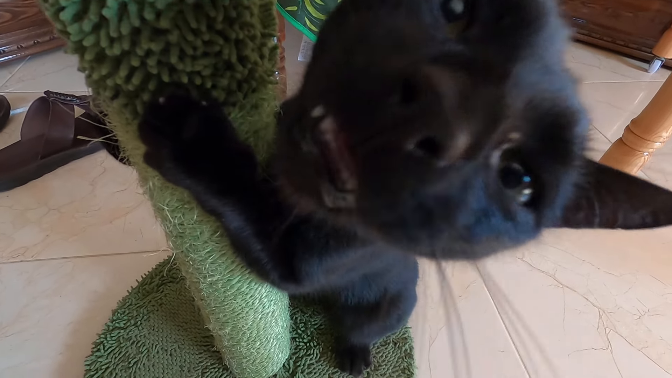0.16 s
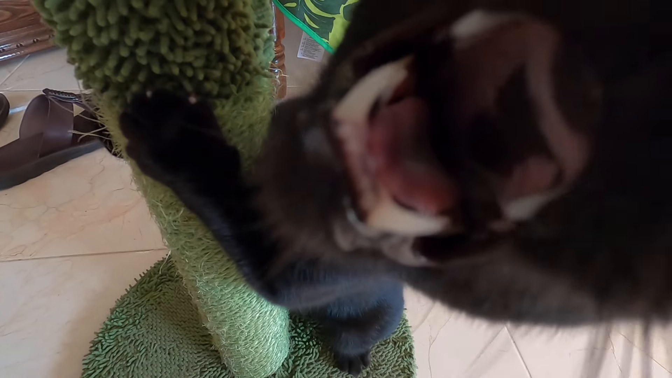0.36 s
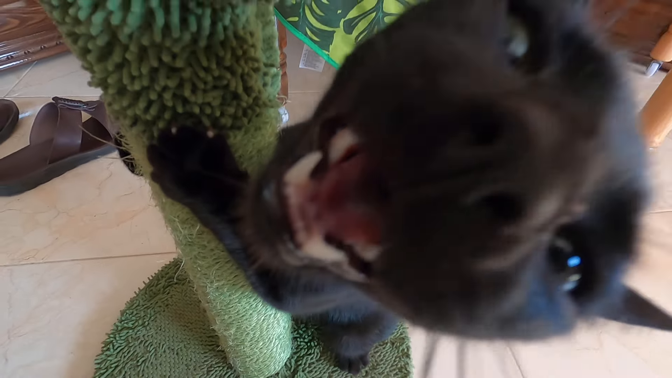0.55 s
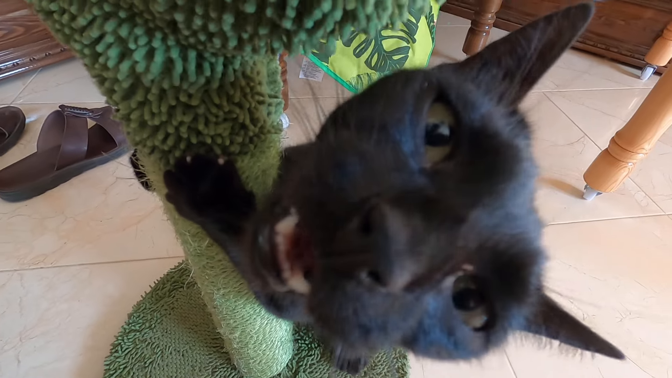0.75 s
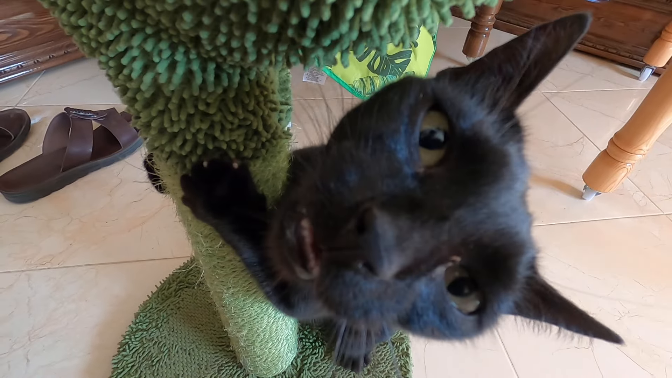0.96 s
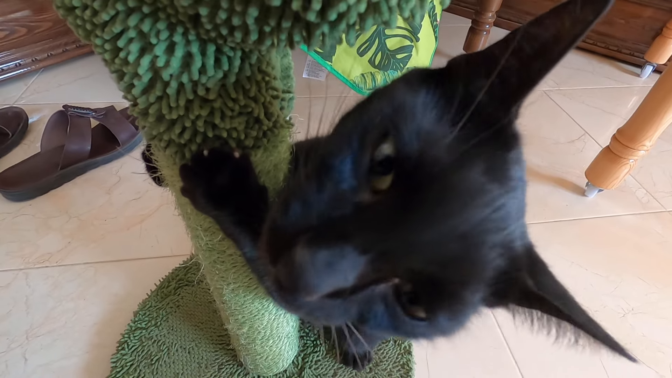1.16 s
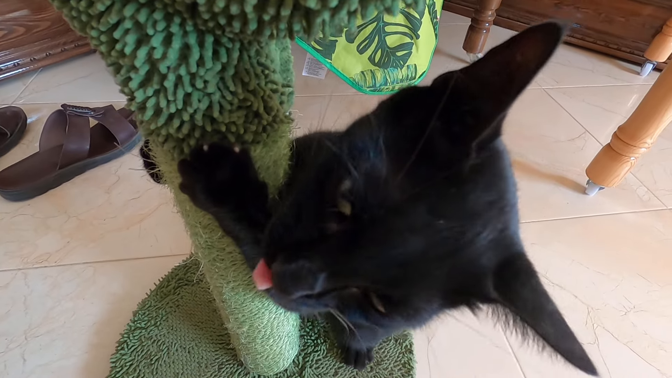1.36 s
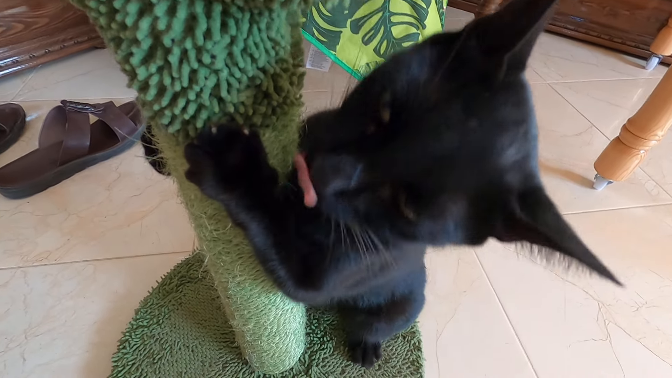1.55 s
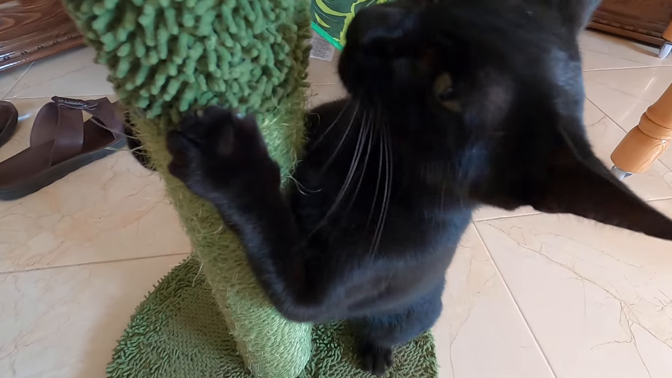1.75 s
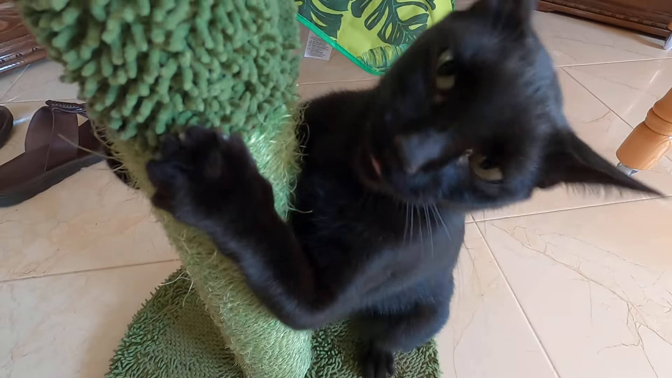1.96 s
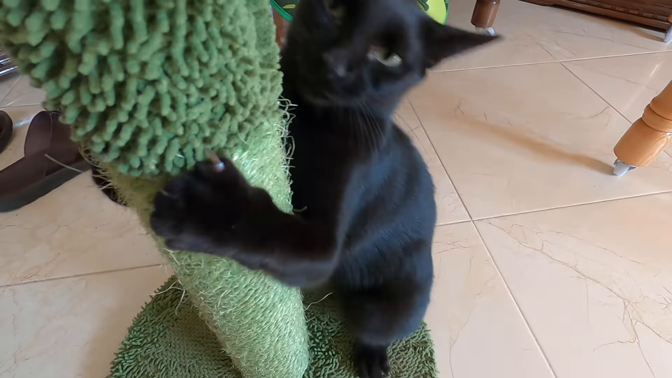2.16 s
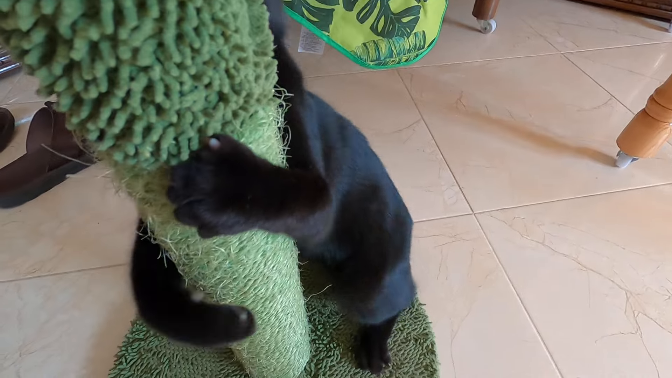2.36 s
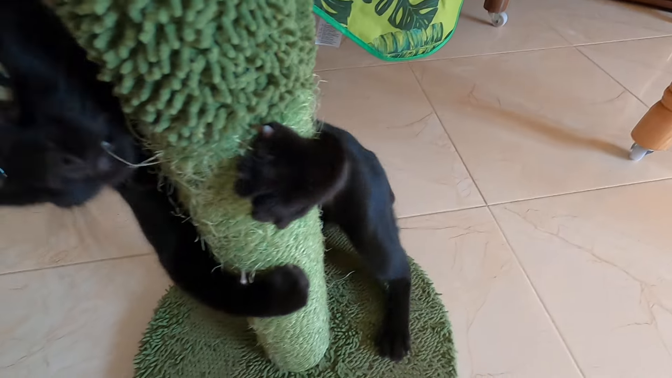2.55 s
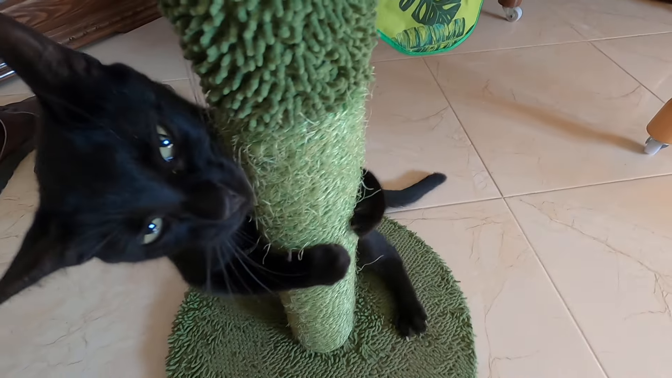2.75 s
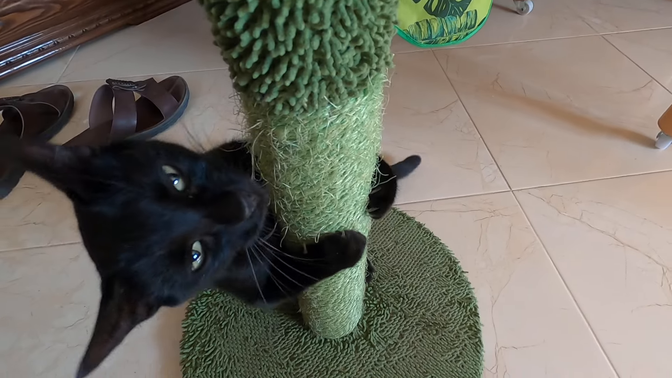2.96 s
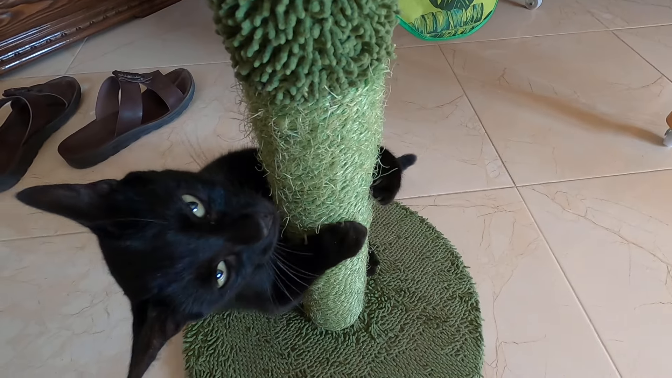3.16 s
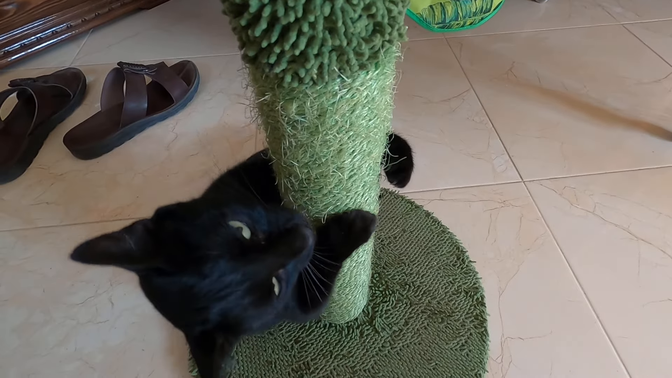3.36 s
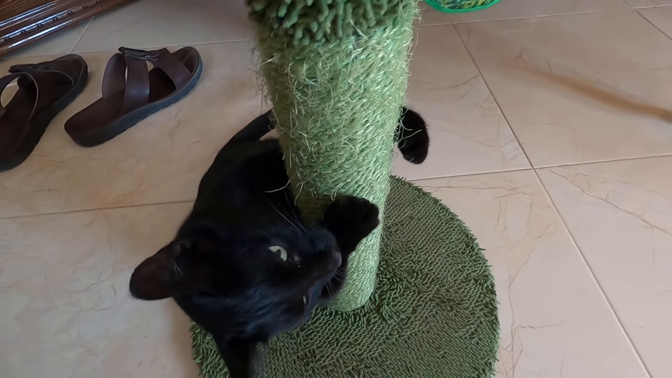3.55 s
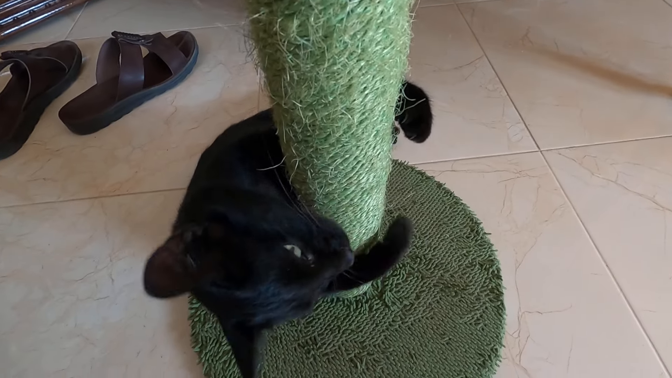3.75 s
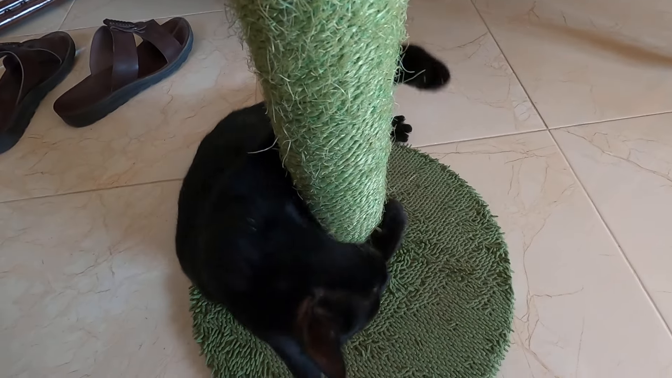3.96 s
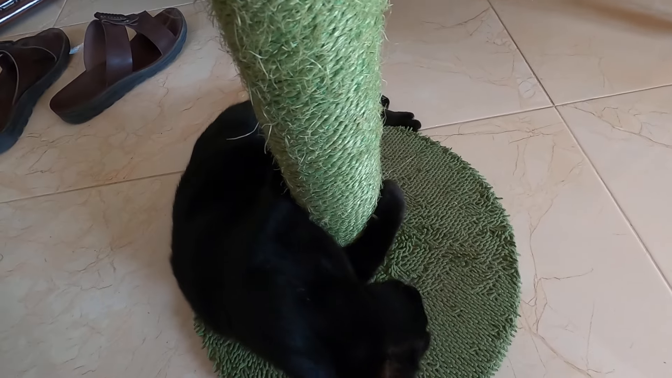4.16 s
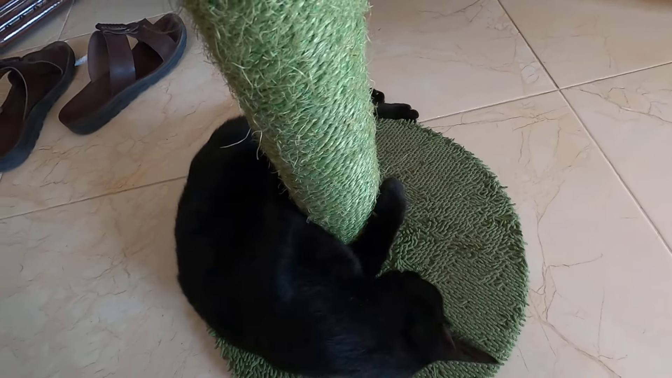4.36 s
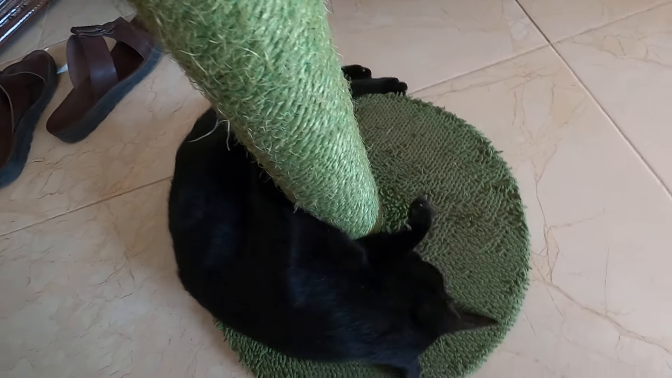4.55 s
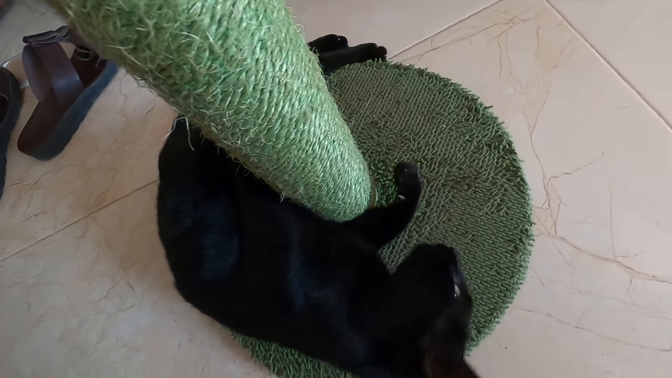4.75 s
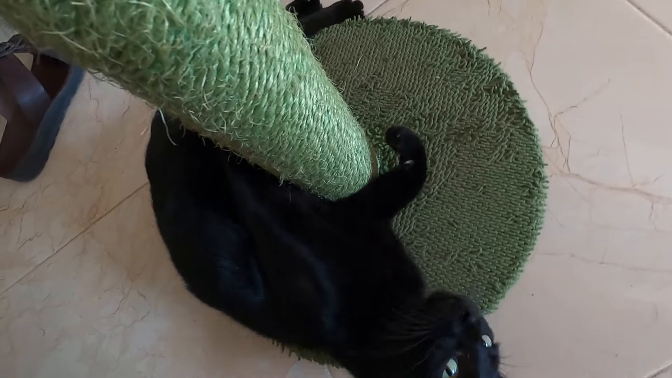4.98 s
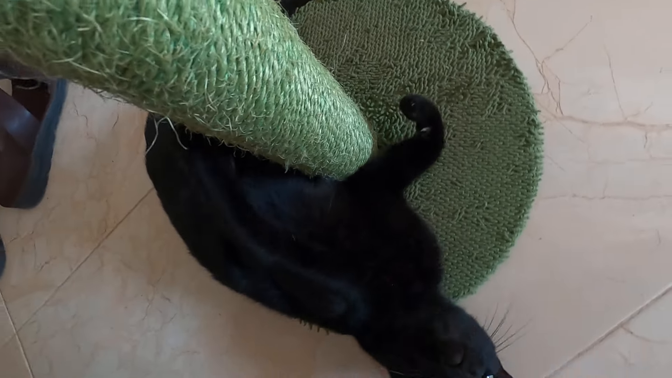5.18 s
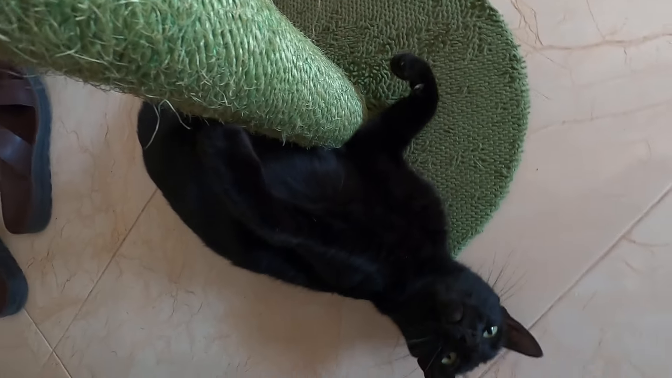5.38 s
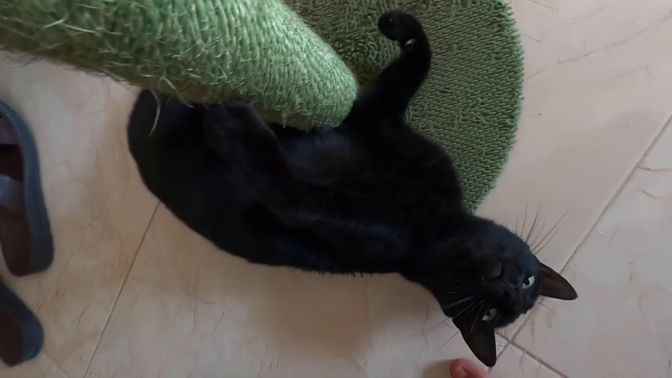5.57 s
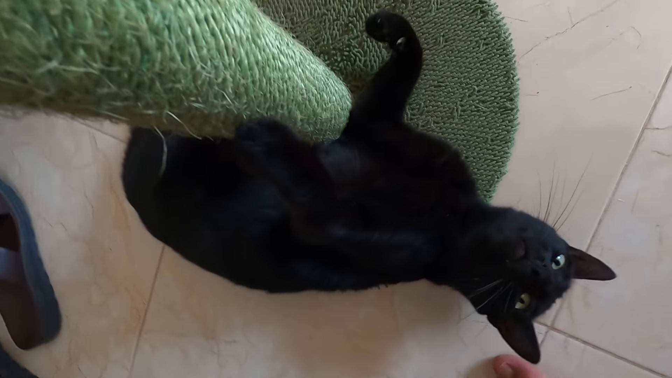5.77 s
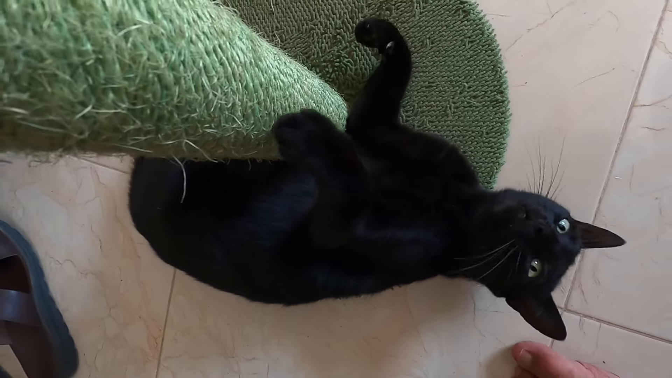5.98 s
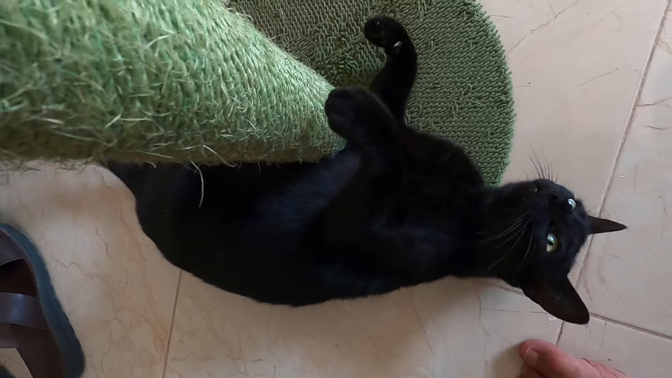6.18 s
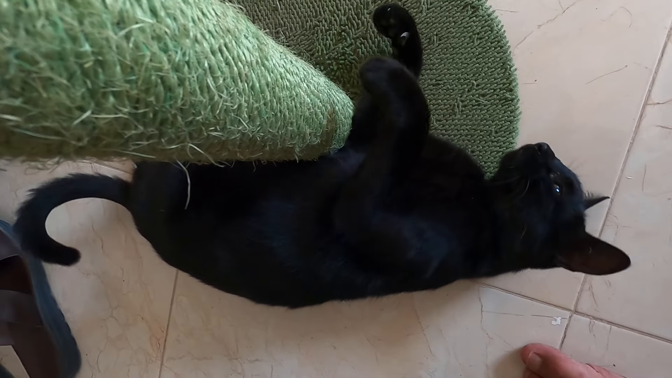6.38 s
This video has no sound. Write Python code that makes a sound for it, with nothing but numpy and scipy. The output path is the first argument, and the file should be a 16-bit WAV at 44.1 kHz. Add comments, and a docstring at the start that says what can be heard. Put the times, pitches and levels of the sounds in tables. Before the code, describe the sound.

Crisp ticks of rope fibres catching and releasing, each with a short hollow tube knock, over fine scratchy paw rubbing. A sharp double click comes early, then a near lull, then a busy irregular flurry with dull thumps of the base, then single snags with gaps, ending in soft brushing. Close stereo phone pickup, short bright tile reflections, dull room air, faint rumble and motor hum.

```python
"""Sharp clicks and hollow knocks over a fine rasp: a cat claws a rope-wrapped scratching post in a tiled room,
and once its tongue clicks faintly in a lick. Each freed fibre ticks by damped resonance; its recoil knocks the
cardboard tube as a dispersive bending wave. Paws and fur rasp by stick-slip friction, dense trains of tiny
grains; weight on the base gives soft low bumps, and the cat rolls over on the mat near the end. Decaying noise
echoes the claws off the tiles. Air noise, a deep rumble and the harmonics of a motor lie behind, heard through
a phone close by."""
import sys
import numpy as np
from scipy import signal
from scipy.fft import rfft, irfft
from scipy.io import wavfile
from scipy.ndimage import uniform_filter1d

SR = 44100
rng = np.random.default_rng(int(sys.argv[2]) if len(sys.argv) > 2 else 0)


def unload_wav(signal):
    """Save mono or channel-first audio to the path in sys.argv[1] as 16-bit WAV at rate SR, clipped to [-1, 1]."""
    wavfile.write(
        sys.argv[1],
        SR,
        np.round(np.clip(np.atleast_2d(signal).T, -1, 1) * 32767).astype(np.int16),
    )


N = 283122
HIT_SIZE = 16384  # samples in one short sound
WINDOW_S = .005  # the energy of a short sound is stated as a level over this time

# Claws letting go of the rope, and one lick. Each row: start in seconds, fibre tick in dB, fibre pitch in Hz,
# fraying time in seconds, bright crack in dB, knock in the tube in dB, pitch of the rope coil in Hz. Crack and
# knock are levels before the trims in snaps(). The faint row at 1.5487 s is the cat's tongue clicking in a
# lick, sounded the same way.
CLAW_SNAPS = [(0.167, -54.5, 4040, 0.0029, -55.5, -50, 1950), (0.259, -61, 3900, .0012, -60, -52, 1720),
              (0.3268, -46, 2850, 0.0015, -77, -43, 503), (0.4365, -33.5, 4980, .0004, -38, -28, 2100),
              (0.4385, -29.5, 1940, 0.0018, -41.5, -35, 2100),
              (0.8275, -45, 3970, 0.0024, -57, -52.5, 2400), (1.5487, -68, 6140, .005, -65, -63, 1850),
              (1.704, -87, 5970, 0.011, -61, -54.5, 1920), (2.1539, -68, 4200, .0012, -56.5, -66, 1870),
              (2.2394, -47, 3360, 0.0016, -45.5, -37.5, 2670), (2.2459, -64, 4500, 0.00031, -48, -41, 2200),
              (2.4413, -37, 4200, 0.0024, -37.5, -36, 2740),
              (2.6132, -46.5, 4260, 0.0023, -72, -52.5, 2450),
              (2.6838, -31, 3570, 0.00012, -27.5, -26.5, 2210), (2.7293, -50, 3200, .0012, -70, -39, 2390),
              (2.7454, -39, 3500, .002, -62, -33, 1850), (2.7804, -32.5, 3320, .002, -59, -37.5, 2500),
              (2.7877, -28, 3870, 0.0018, -32, -27.5, 2550), (2.806, -58, 3300, .0012, -74.5, -37, 1030),
              (2.818, -42, 4040, .004, -39.5, -34, 2300), (2.8302, -33, 4200, .0004, -35, -29, 2090),
              (2.9154, -36, 2770, 0.0011, -67, -42, 2110), (2.9229, -25.5, 4760, 0.00079, -38.5, -32, 1940),
              (3.0442, -39, 3020, .0012, -72, -44, 2280), (3.051, -44, 2800, 0.0013, -75, -37.5, 1970),
              (3.073, -46, 3900, 0.0013, -48, -46, 1690), (3.0826, -21, 3430, .0008, -28, -24.5, 2100),
              (3.0878, -25.5, 4100, .0008, -29.5, -23.5, 1670), (3.0938, -29, 3950, 0.0017, -54, -25, 1890),
              (3.1031, -43, 3130, 0.0038, -46, -31, 2500), (3.1088, -31.5, 3400, 0.0015, -37, -31, 2110),
              (3.2107, -52, 2720, 0.0014, -73, -44, 2480), (3.2522, -44, 3240, 0.00059, -63, -34, 2000),
              (3.4645, -28.5, 3520, 0.0023, -32.5, -24.5, 2100),
              (3.5058, -37, 4060, .0006, -37.5, -34.5, 2070), (3.5175, -45, 4100, 0.0044, -45, -41, 1004),
              (3.5917, -37.5, 3570, 0.007, -63, -39, 3000), (3.5972, -27.5, 3060, .0015, -37, -30, 2270),
              (3.605, -58, 3520, 0.004, -46.5, -48, 2150), (3.82, -36, 2270, 0.0012, -37, -27, 2040),
              (4.1263, -40, 4170, 0.0015, -71, -38.5, 2170), (4.1352, -31.5, 4490, 0.001, -45, -32.5, 2720),
              (4.3087, -50, 5000, 0.0025, -64, -56, 1660), (4.435, -47.5, 3323, 0.0018, -53, -45.5, 2397),
              (4.559, -32, 4340, .0007, -37, -31.5, 2400), (4.5665, -37.5, 3670, 0.0013, -40, -38.5, 2500),
              (4.6228, -48, 3960, 0.0026, -58.5, -62, 1690), (5.164, -57, 3987, 0.0053, -56, -45, 1457),
              (5.2219, -44.5, 3900, 0.0026, -48, -42, 2354)]
# Colour of the bright crack. Each row: frequency in Hz, relative spectral density in dB.
CRACK_COLOUR = [(1500, -33), (4000, 3), (7000, 7), (9000, -2.5), (11000, -9), (12500, -10), (14500, -16),
                (16000, -31)]
# The cat slides down the post. Each row: time in seconds, height of the claws (1 top of the rope, 0 base).
CLAW_HEIGHT = [(0, 0.71), (2.65, 0.97), (3.6, 0.031)]
# Share of a knock that thuds in the post: less from high up, more once the drag exceeds HANG_DB.
THUD_DB, THUD_AT_TOP_DB, HANG_DB, THUD_PER_DRAG_DB = -7.5, -4.5, -57, 0.5
RING_AT_TOP_DB = -3.5  # the plush sleeve at the top damps the tube's ringing


def snaps(rows, drag, fibre_width=0.52, fray=1.4, ring_db=-4, paths_s=0.0033, crack_db=1, knock_db=1):
    """Impulse excitation: a freed fibre ticks and cracks, and its recoil sounds the tube and rocks the post."""
    f = freqs(HIT_SIZE)
    bright, body = np.zeros(N), np.zeros(N)
    for s, tick, fibre_hz, fray_s, crack, knock, coil_hz in rows:
        height = np.interp(s, *np.transpose(CLAW_HEIGHT))

        # neighbouring fibres give way after the first: a quick release is one clean crack, a slow one a tiny scrape
        frayed = 1 + fray * fray_s / .002 * scattered(fray_s)
        fibre = resonance(f, fibre_hz, fibre_width * fibre_hz) ** 2
        add(bright, s, fibre * frayed, tick)
        add(bright, s, colour(CRACK_COLOUR, f) * frayed, crack + crack_db)

        travel = bending_wave(f)
        ring = unit(modes(TUBE_MODES, f, scatter_db=3))
        ring_gain = undb(ring_db + RING_AT_TOP_DB * height)
        blow = unit(colour(KNOCK_COLOUR, f) * (1 + scattered(paths_s)))
        tube = blow + ring_gain * ring
        add(body, s, tube * echo_notch(f, height) * rope_coil(f, coil_hz) * travel, knock + knock_db)

        hanging = max(drag[int(s * SR)] - HANG_DB, 0)
        thud = knock + THUD_DB + THUD_AT_TOP_DB * height + THUD_PER_DRAG_DB * hanging
        add(body, s, rocking(f) * travel, thud)
    bright_pair = ports(bright, lag_samples=1.98, pan_db=2.0, shade_db=9.0)
    return bright_pair + ports(body, lag_samples=2.0, pan_db=0.9, shade_db=0.5)


def bending_wave(f, delay_at_1khz_s=0.001793):
    """Dispersion: bending waves travel as the root of frequency, so a knock arrives as a quick falling chirp."""
    reach = np.exp(0.199 * rng.standard_normal())
    return np.exp(-4j * np.pi * delay_at_1khz_s * reach * np.sqrt(1e3 * f))


def rope_coil(f, hz, edge_width=0.7):
    """Mass-spring filter: the coil between claw and tube peaks at its own pitch and passes little above."""
    return 1 / (1 - (f / hz) ** 2 + 1j * edge_width * f / hz)


NOTCH_TOP_HZ, NOTCH_BASE_HZ = 880, 500  # notch frequency for claws at the top and at the base
NOTCH_WIDTH, NOTCH_DEPTH = 0.47, 0.63  # width as a share of the notch frequency, share of amplitude removed


def echo_notch(f, height):
    """Interference: the echo from the tube's top end weakens one band, higher the nearer the claw is to it."""
    hz = NOTCH_BASE_HZ + (NOTCH_TOP_HZ - NOTCH_BASE_HZ) * height
    return 1 - NOTCH_DEPTH * resonance(f, hz, NOTCH_WIDTH * hz)


def scattered(duration_s):
    """Multipath scattering: many short paths through rope and tube give a burst of decaying noise."""
    t = np.arange(HIT_SIZE) / SR
    return unit(rfft(rng.standard_normal(HIT_SIZE) * np.exp(-t / duration_s)))


# The whole post on its base. Each row: mode in Hz, width in Hz, relative level in dB.
POST_MODES = [(90.4, 58, -8.5), (145, 20, -1.5), (164, 90, -3.5), (198, 4, 1), (235, 67, -14.5),
              (278, 26, -30)]


def rocking(f):
    """Inertia: the heavy post follows only the slow part of a push, which excites its modes."""
    return modes(POST_MODES, f, scatter_db=1) / (1 + 1j * f / 350) ** 2


# Paw or fur sliding over rope and mat. Each row: time of the height in seconds, swell in seconds, fade in
# seconds, rasp in dB before the trim in rubbing(), drag on the tube in dB, snags per second at the height
# (zero or less gives none).
RUB_STROKES = [(0.43, 0.18, 0.1, -59.5, -73, 22), (1.72, 0.17, 1, -72.5, -70, 1),
               (2.19, 0.084, 0.15, -59.5, -65, 30), (2.431, 0.047, 0.08, -56, -61, 25),
               (2.62, 0.1, 0.2, -55, -63, 55), (2.8, 0.089, .075, -54.5, -41.5, 30),
               (3.115, .025, 0.091, -48, -47.5, 25), (3.26, .05, 0.13, -62.5, -58.5, 24.5),
               (3.63, 0.39, 0.12, -60.5, -66, 15), (4.13, 0.18, 0.13, -59.5, -66, 14),
               (4.3, 0.077, 0.15, -60.5, -65, 8), (4.64, .07, 0.1, -60.5, -62, 10),
               (5.22, 0.1, 0.073, -63, -61.5, 20), (5.73, .16, 0.15, -64, -58.5, -2)]
STROKE_SHAPE = 1.3  # 1 is a pointed swell, 2 a rounded one
RESTING_RUB_DB = -79.5  # fur never lies quite still


def strokes():
    """Power summation: the rasp and drag of all strokes add as energies and return as two levels in dB."""
    t = np.arange(N) / SR
    power = np.zeros((2, N)) + undb(RESTING_RUB_DB) ** 2
    for s, swell_s, fade_s, rasp, drag, _ in RUB_STROKES:
        power += (undb([[rasp], [drag]]) * envelope(t, s, swell_s, fade_s)) ** 2
    return 10 * np.log10(power)


# levels of a snag relative to its stroke's rasp, and the scatter in its strength
SNAG_TICK_DB, SNAG_CRACK_DB, SNAG_KNOCK_DB, SNAG_SPREAD_DB = 4.5, -4, 2.5, 4
SNAG_HZ, SNAG_FRAY_S, SNAG_COIL_HZ = 4200, .0018, 1900  # middle fibre pitch, fraying time, coil pitch


def snags():
    """Random point process: small snaps crowd at the height of a stroke, their strength following its rasp."""
    t, rows = np.arange(N) / SR, []
    for s, swell_s, fade_s, rasp, _, per_s in RUB_STROKES:
        effort = envelope(t, s, swell_s, fade_s)
        places = np.flatnonzero(rng.random(N) < per_s * effort / SR)
        # at most 32 snags in a stroke
        for i, (size, pitch) in zip(places, rng.standard_normal(size=(32, 2))):
            db = rasp + 20 * np.log10(effort[i]) + SNAG_SPREAD_DB * size
            fibre_hz = SNAG_HZ * np.exp(.17 * pitch)
            # same columns as CLAW_SNAPS
            rows.append((t[i], db + SNAG_TICK_DB, fibre_hz, SNAG_FRAY_S,
                         db + SNAG_CRACK_DB, db + SNAG_KNOCK_DB, SNAG_COIL_HZ))
    return rows


def envelope(t, s, swell_s, fade_s):
    """Stretched-exponential law: every stroke swells and fades alike about its height."""
    distance = np.where(t < s, (s - t) / swell_s, (t - s) / fade_s)
    return np.exp(-distance ** STROKE_SHAPE)


# Colour of the rasp. Each row: frequency in Hz, relative spectral density in dB.
RASP_COLOUR = [(300, -1.5), (900, -5), (2000, -8.5), (2700, -0.5), (3800, -0.5), (5500, -6), (8000, -12.5),
               (10500, -21.5), (12500, -25), (14500, -25), (16000, -43)]
# Colour of a knock. Each row: frequency in Hz, relative spectral density in dB.
KNOCK_COLOUR = [(100, -29.5), (400, -2), (700, 0.5), (950, 2.5), (1500, -6), (2100, 0), (2600, -2),
                (4000, -19), (8000, -16.5), (16000, -52.5)]
# Ringing of the tube. Each row: mode in Hz, width in Hz, relative level in dB.
TUBE_MODES = [(602.6, 63, 0), (907, 40, 9.5), (1064, 81, -16.5), (1458, 93, -0.5), (1540, 58, -3),
              (1794, 15, -15.5), (2067, 56, -2.5), (3025, 200, 0), (3773, 31, -0.5), (3900, 70, -11)]


def rubbing(rasp_level, drag_level, rub_db=-1, apart=0.9, tube_db=-4, fur_db=-1):
    """Stick-slip friction: fibres rasp, fur brushes smoothly, and coarser slips sound through the tube."""
    f = freqs(N)
    fibres = unit(irfft(rfft(grains(rate=1500, spread_db=1.8)) * colour(RASP_COLOUR, f), N))
    fur_noise = rng.standard_normal((3, N))
    fur = unit(irfft(rfft(fur_noise) * colour(RASP_COLOUR, f), N)) * undb(fur_db)
    # one fur noise is shared; the other two belong to one microphone each
    rasp = ports(fibres + .5 * fur[0], lag_samples=2.0, pan_db=5.0, shade_db=13.5) + apart * fur[1:]
    # the paw catches and slides by turns
    slip = undb(rasp_level + rub_db + 1.1 * walk(60))

    ring, rock = unit(modes(TUBE_MODES, f, scatter_db=0)), unit(rocking(f))
    tube = unit(colour(KNOCK_COLOUR, f)) + undb(tube_db) * ring + rock
    # soft pads pass no high treble into the tube
    pads = 1 / (1 + (f / 5000) ** 4)
    slips = rfft(grains(rate=220, spread_db=5.0))
    drag = unit(irfft(slips * tube * pads, N)) * undb(drag_level)
    return rasp * slip + ports(drag, lag_samples=3.7, pan_db=0.5, shade_db=-5.5)


def grains(rate, spread_db):
    """Shot noise: slips of single hairs and fibres, rate per second, mostly weak and now and then stronger."""
    sizes = undb(spread_db * np.minimum(rng.exponential(size=N), 4))
    return (rng.random(N) < rate / SR) * sizes * rng.choice([-1, 1], N)


# The cat's weight bumps the post and its base. Each row: time in seconds, peak in dB, frequency in Hz,
# duration to either side in seconds (to 1/e), ring of the post in dB.
BASE_BUMPS = [(2.798, -34, 81, 0.01, -35), (2.819, -41, 56.3, 0.011, -38), (2.836, -25, 50, 0.0075, -42),
              (2.928, -27.5, 45.8, 0.0087, -44), (2.965, -45.5, 28, 0.019, -52.5),
              (3.113, -41.5, 135, 0.008, -24), (5.732, -48, 34, 0.07, -56)]


def bumps():
    """Heavily damped oscillation: the base swings softly and briefly, and the post rings with it."""
    t, out = np.arange(N) / SR, np.zeros(N)
    for s, db, hz, duration, ring_db in BASE_BUMPS:
        swing = np.exp(-((t - s) / duration) ** 2) * np.cos(2 * np.pi * hz * (t - s))
        out += undb(db) * swing
        add(out, s, rocking(freqs(HIT_SIZE)), ring_db)
    return ports(out, lag_samples=3, pan_db=1.0, shade_db=-0.5)


def room_echo(x, wet_db=-12, t60_low_s=0.297, t60_high_s=0.24, early_db=-14, early_s=0.0061, gap_s=0.0008,
              alike_hz=500):
    """Reverberation: quick reflections off tiles and furniture, then the short diffuse ring of the room."""
    t = np.arange(HIT_SIZE) / SR
    f = freqs(HIT_SIZE)
    low = 1 / (1 + (f / 2500) ** 2)
    # long waves reach both microphones alike
    own = f ** 2 / (f ** 2 + alike_hz ** 2)
    noise = rfft(rng.standard_normal((3, 3, HIT_SIZE)))
    dark, light, near = noise[:, :1] * np.sqrt(1 - own) + noise[:, 1:] * np.sqrt(own)
    tail = irfft(dark * np.sqrt(low)) * np.exp(-np.log(1000) * t / t60_low_s)
    tail += irfft(light * np.sqrt(1 - low)) * np.exp(-np.log(1000) * t / t60_high_s)
    tail *= 1 - np.exp(-t / gap_s)
    early = irfft(near) * np.exp(-t / early_s) * (t > .001)
    response = undb(wet_db) * unit(tail) + undb(early_db) * unit(early)
    return signal.fftconvolve(x, response / np.sqrt(HIT_SIZE), axes=1)[:, :N]


HUM_HZ = 48.36  # mean turning rate of the motor
# Harmonics of the motor. Each row: multiple of the turning rate, level at the start in dB,
# drift in dB per second as the phone moves.
HUM_HARMONICS = [(1, -58.5, -0.67), (3, -68.5, .5), (4, -73, 2), (6, -80, 1.5)]
# The lowest harmonic sinks away for a moment: time in seconds, half length in seconds, depth in dB.
LOWEST_DIP = (1.28, 0.18, -22)


def motor(waver_db=1.5):
    """Harmonic series: sines at multiples of one slightly wavering turning rate, each wavering in level."""
    t = np.arange(N) / SR
    phase = 2 * np.pi * np.cumsum(HUM_HZ * (1 + 0.00816 * walk(6))) / SR
    dip_s, half_s, depth_db = LOWEST_DIP
    dip = depth_db * np.exp(-((t - dip_s) / half_s) ** 2)
    hum = np.zeros(N)
    for multiple, db, drift in HUM_HARMONICS:
        level = db + drift * t + dip * (multiple == 1) + waver_db * walk(9)
        hum += np.sqrt(2) * np.sin(multiple * phase) * undb(level)
    return ports(hum, lag_samples=2.2, pan_db=0, shade_db=-2.5)


# Colour of the room's air noise. Each row: frequency in Hz, relative spectral density in dB.
ROOM_COLOUR = [(15, -17), (30, 4), (55, -4.5), (80, -0.5), (115, -10.5), (180, -3), (280, -7.5), (410, -11),
               (620, -6), (1250, -4.5), (1750, -7.5), (2400, -17), (4200, -32.5), (7800, -40.5),
               (9500, -52.5), (16000, -68.5)]
ROOM_DB = -56.5  # level of the shared noise from 250 to 2500 Hz, before the slow changes and the lean
# Course of the air noise. Each row: time in seconds, level in dB, of which only the departure from the mean counts.
AIR_COURSE = [(0.0, -57.5), (2.5, -60), (2.93, -58.5), (3.52, -61.5), (6.42, -59)]
# Course of the deep rumble. Each row: time in seconds, level in dB, again counted from its mean.
RUMBLE_COURSE = [(0.0, -70.5), (0.34, -77.5), (0.59, -69.5), (1.38, -86), (1.7, -77.5), (2.2, -78),
                 (2.91, -63.5), (3.25, -75.5), (4.38, -76), (4.61, -74), (5.01, -73.5), (5.61, -75),
                 (6.42, -79)]


def room_tone(rumble_db=1, width=.9, lean_db=2.0):
    """Diffuse-field coherence: air noise and rumble, alike at both microphones in the bass, not in the treble."""
    f = freqs(N)
    mid, side = (rfft(rng.standard_normal(N)) * colour(ROOM_COLOUR, f) for _ in range(2))
    side *= width * colour([(60, -9.0), (200, -7.5), (400, -8), (1300, -7.5), (4400, -0.5), (8000, 2.5)], f)
    middle_band = irfft(mid * ((f > 250) & (f < 2500)), N)
    scale = undb(ROOM_DB) / np.std(middle_band)
    lean = undb(np.array([[lean_db], [-lean_db]]) / 2)
    pair = np.array([mid + side, mid - side]) * scale * lean
    deep = 1 / (1 + (f / 120) ** 4)
    air = irfft(pair * (1 - deep), N) * undb(curve(AIR_COURSE) + 0.13 * walk(2.2))
    return air + irfft(pair * deep, N) * undb(curve(RUMBLE_COURSE) + rumble_db)


def ports(x, lag_samples, pan_db, shade_db):
    """Interaural-style cues: the left microphone hears later by the lag; a positive shade dulls its treble."""
    f = freqs(N)
    lean = pan_db - shade_db * f ** 2 / (f ** 2 + 9000 ** 2)
    # long waves bend around the phone and arrive a little later than short ones
    lag = lag_samples / (1 + (f / 9000) ** 2)
    half = undb(lean / 2) * np.exp(-1j * np.pi * f * lag / SR)
    return irfft(rfft(x) * np.array([half, 1 / half]), N)


def add(track, s, spectrum, db):
    """Energy scaling: place a short sound at time s; db is its energy spread over the reference window."""
    lead = HIT_SIZE // 64  # room for what precedes the peak
    hit = np.roll(irfft(spectrum), lead)
    hit *= undb(db) * np.sqrt(WINDOW_S * SR / np.sum(hit ** 2))
    start = max(int(s * SR) - lead, 0)
    track[start:start + HIT_SIZE] += hit[:N - start]


def resonance(f, hz, width):
    """Damped resonance: the response of a single mode."""
    return 1 / (1 + 1j * (f * f - hz * hz) / (f * width))


def modes(table, f, scatter_db):
    """Modal superposition: the place of the blow, drawn by chance, decides how strongly each mode speaks."""
    chance = rng.standard_normal(len(table))
    return sum(undb(db + scatter_db * c) * resonance(f, hz, width) for (hz, width, db), c in zip(table, chance))


def colour(points, f):
    """Spectral envelope: gain of a (Hz, dB) outline, straight in log frequency."""
    hz, db = np.transpose(points)
    return undb(np.interp(np.log(f), np.log(hz), db))


def freqs(size):
    """Fourier bins in Hz, kept above zero."""
    return np.maximum(np.fft.rfftfreq(size, 1 / SR), 1)


def curve(rows):
    """Linear interpolation: a level course in dB about its own mean."""
    db = np.interp(np.arange(N) / SR, *np.transpose(rows))
    return db - db.mean()


def walk(rate):
    """Smoothed noise: a slow wander with a spread near 1, from rate random steps per second."""
    k = int(SR / rate)
    steps = np.repeat(rng.standard_normal(N // k + 1), k)
    return 1.294 * uniform_filter1d(uniform_filter1d(steps, k), k)[:N]


def unit(x):
    """Normalization to rms 1."""
    return x / np.sqrt(np.mean(np.abs(x) ** 2))


def undb(db):
    """Logarithmic level: decibels to gain."""
    return 10 ** (np.asarray(db) / 20)


def scene():
    """Superposition: claws and paws with their echo, then bumps, air and motor."""
    rasp, drag = strokes()
    claws = snaps(CLAW_SNAPS, drag) + rubbing(rasp, drag)
    rest = bumps() + room_tone() + motor()
    claws = claws + snaps(snags(), drag)
    return claws + room_echo(claws) + rest


def record(dry, roll_hz=14500, top_hz=16300):
    """Low-pass filtering: the microphones lose the highest treble and the phone cuts the top."""
    dull = signal.sosfilt(signal.butter(6, roll_hz, fs=SR, output="sos"), dry)
    return signal.sosfilt(signal.ellip(8, .2, 70, top_hz, fs=SR, output="sos"), dull)


dry = scene()
out = record(dry)
unload_wav(out)
```